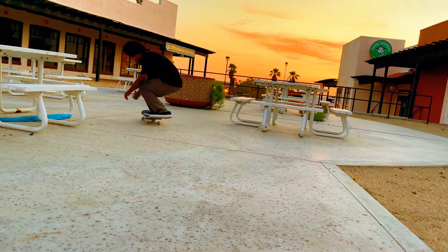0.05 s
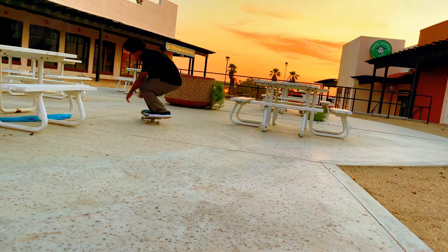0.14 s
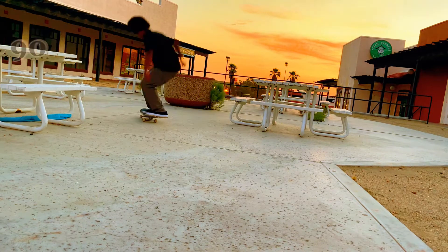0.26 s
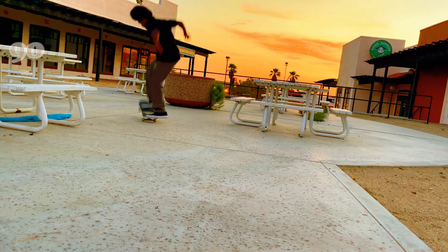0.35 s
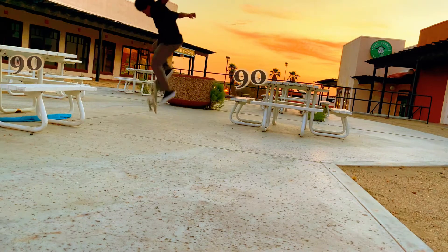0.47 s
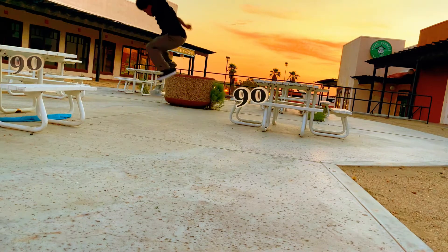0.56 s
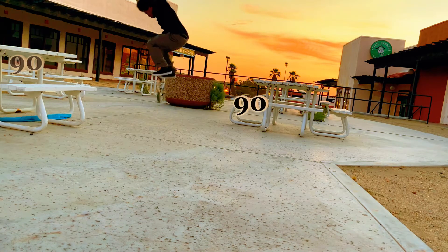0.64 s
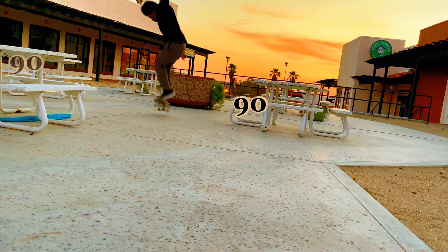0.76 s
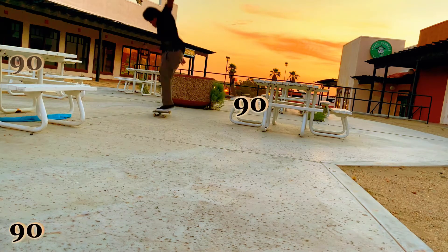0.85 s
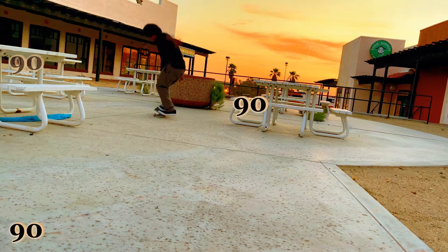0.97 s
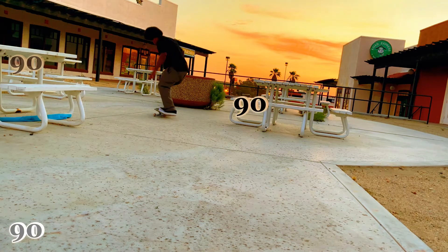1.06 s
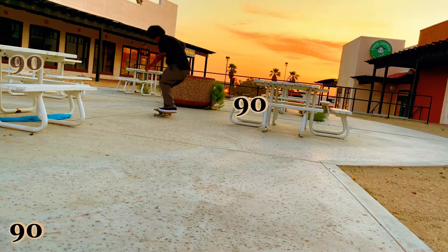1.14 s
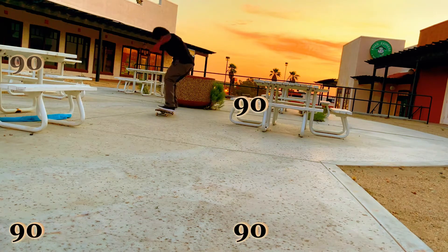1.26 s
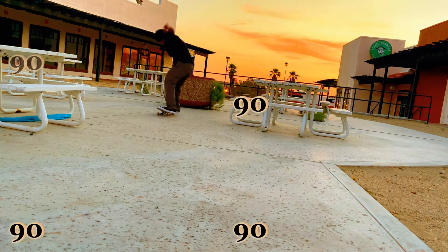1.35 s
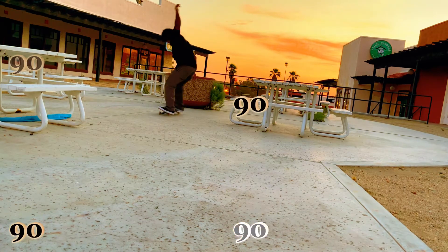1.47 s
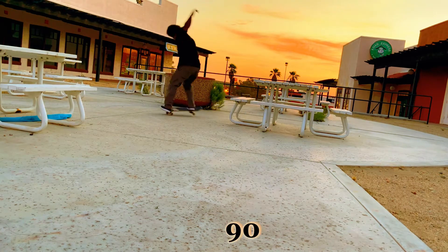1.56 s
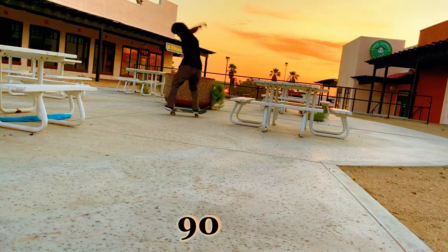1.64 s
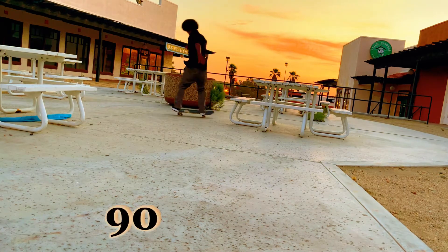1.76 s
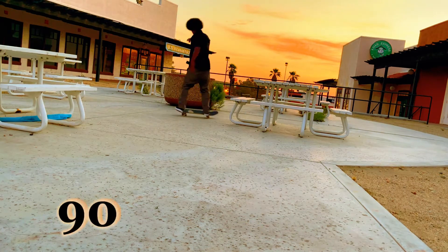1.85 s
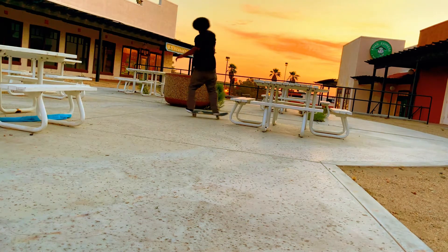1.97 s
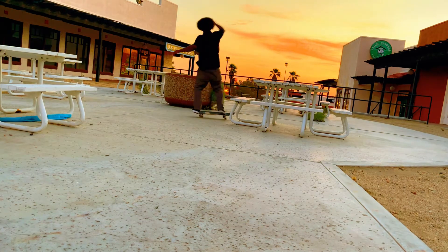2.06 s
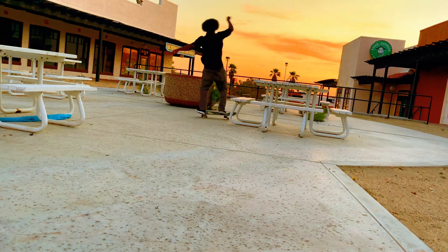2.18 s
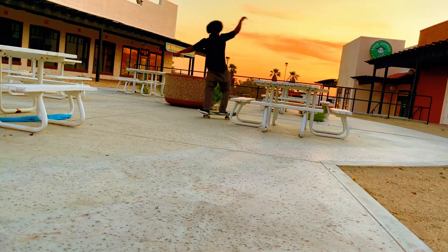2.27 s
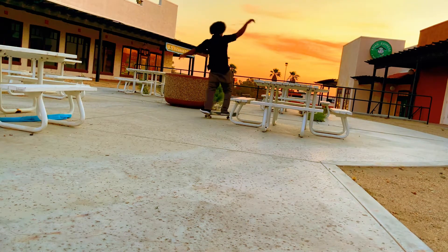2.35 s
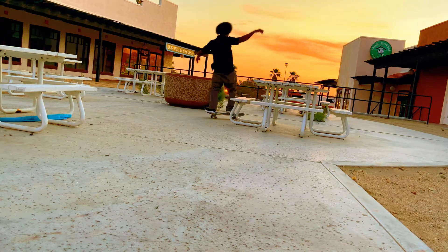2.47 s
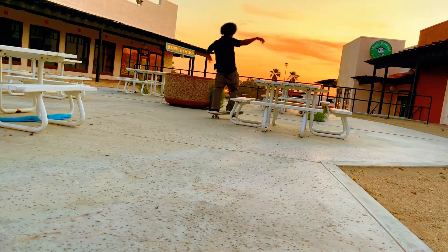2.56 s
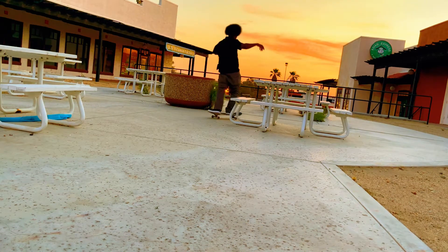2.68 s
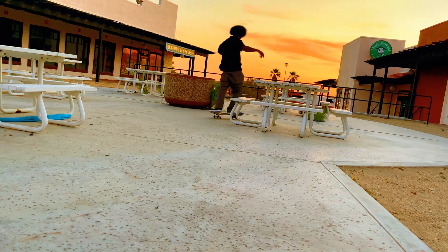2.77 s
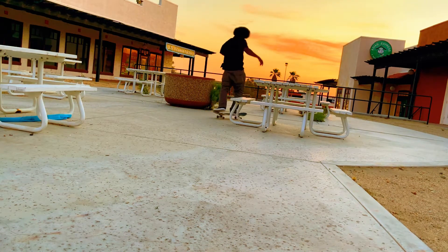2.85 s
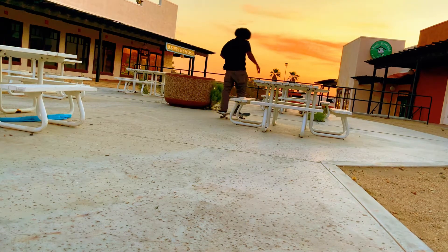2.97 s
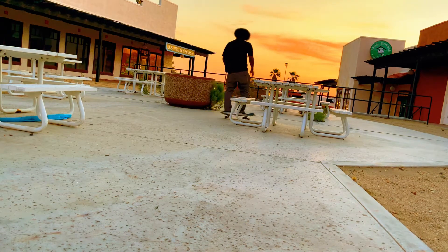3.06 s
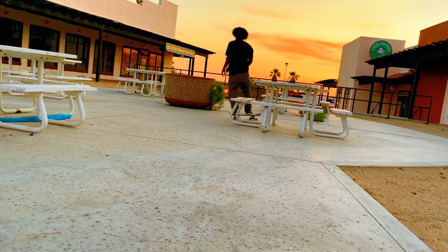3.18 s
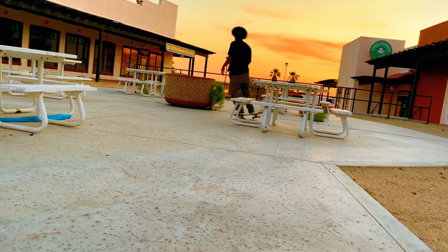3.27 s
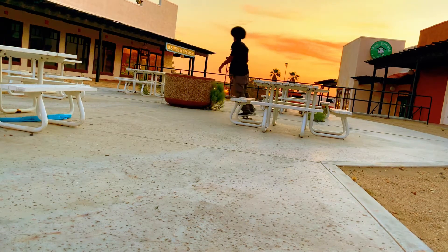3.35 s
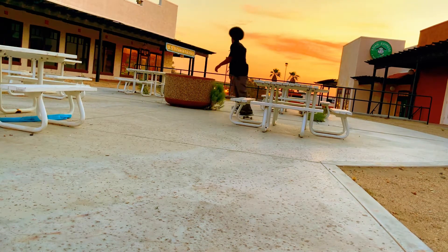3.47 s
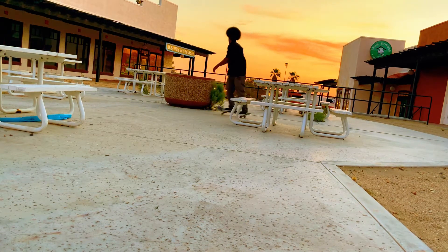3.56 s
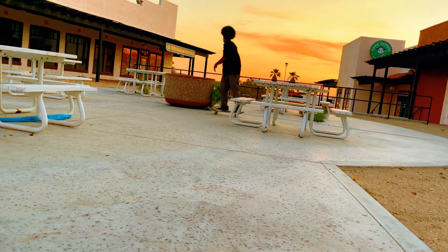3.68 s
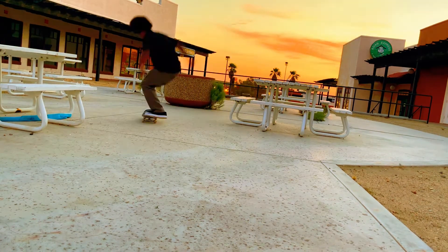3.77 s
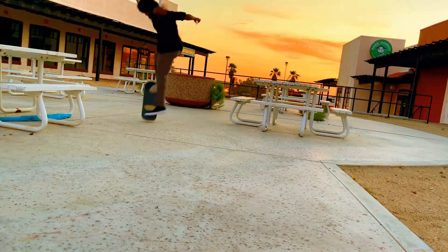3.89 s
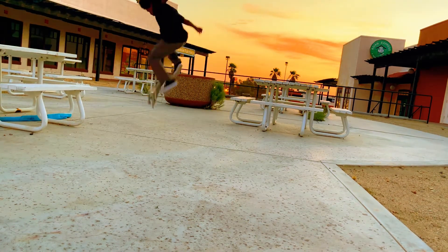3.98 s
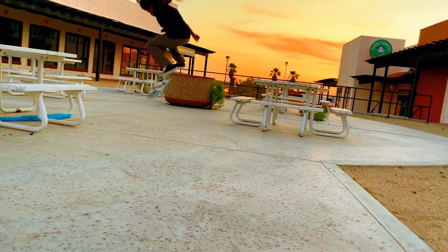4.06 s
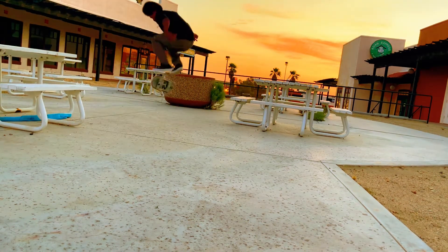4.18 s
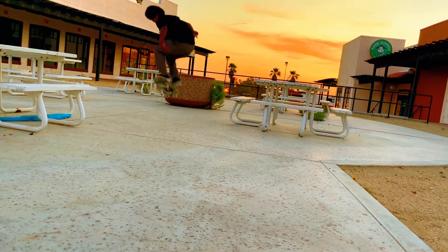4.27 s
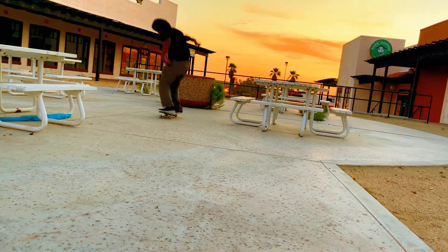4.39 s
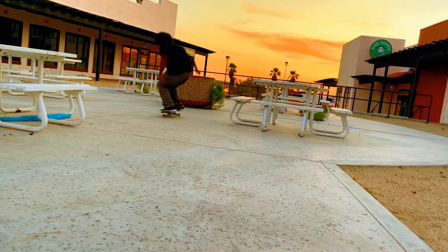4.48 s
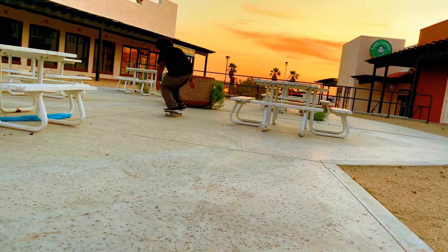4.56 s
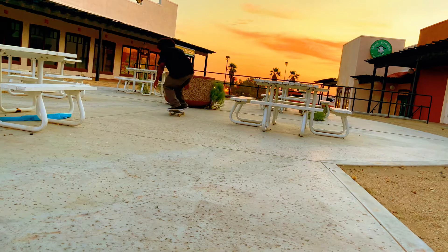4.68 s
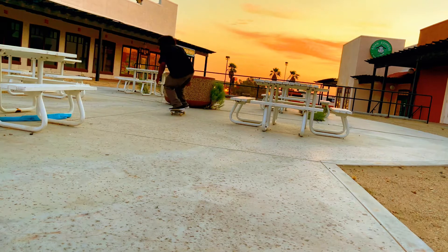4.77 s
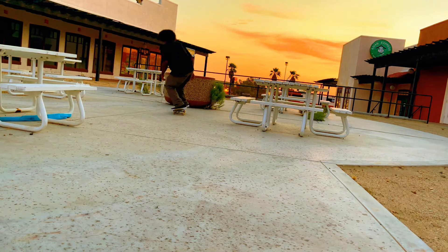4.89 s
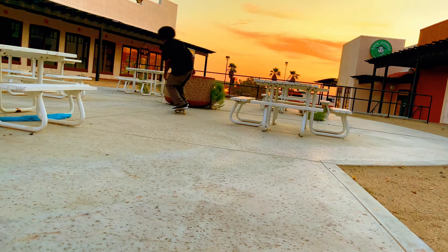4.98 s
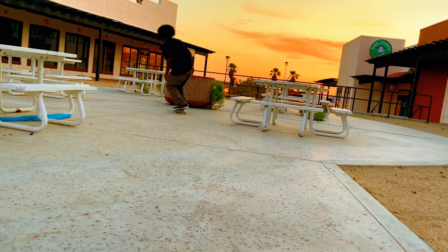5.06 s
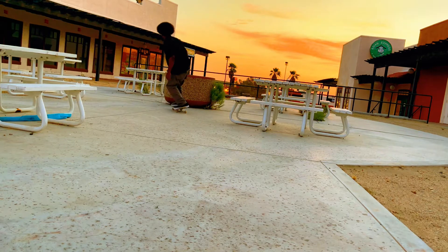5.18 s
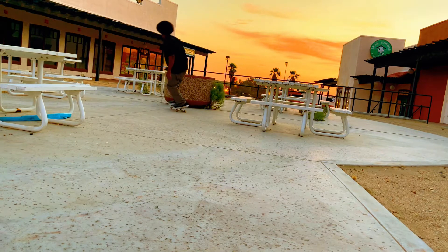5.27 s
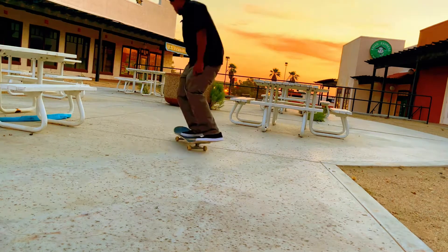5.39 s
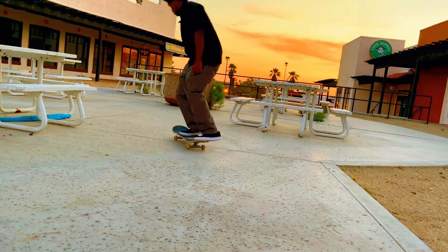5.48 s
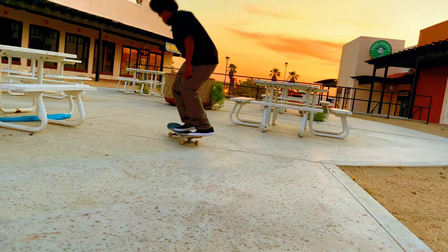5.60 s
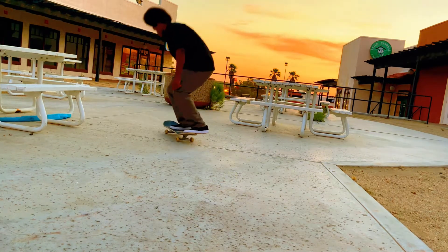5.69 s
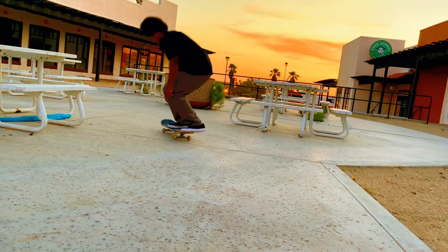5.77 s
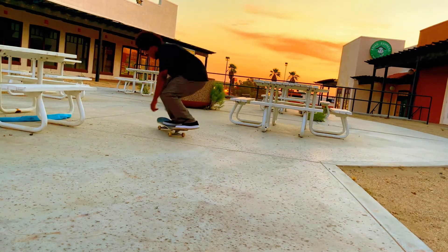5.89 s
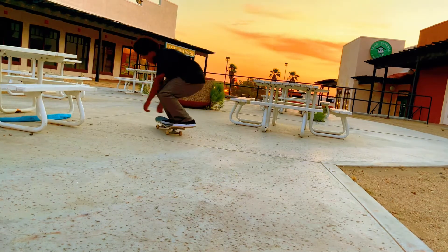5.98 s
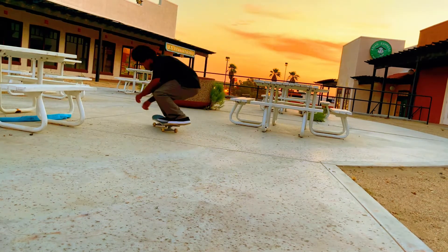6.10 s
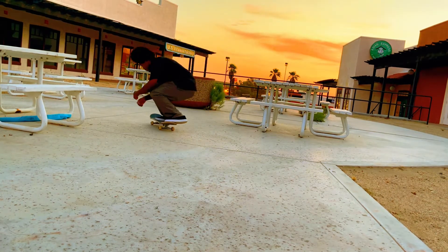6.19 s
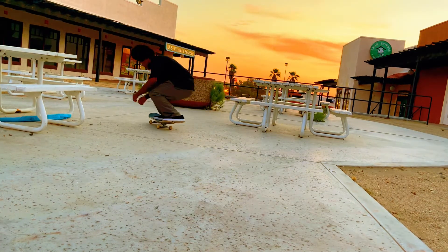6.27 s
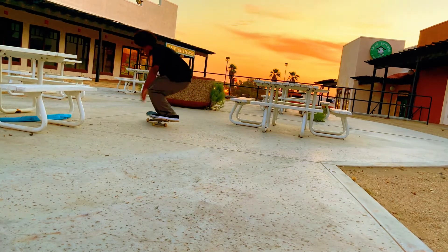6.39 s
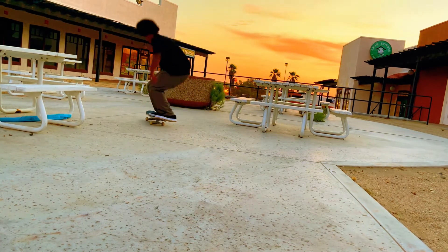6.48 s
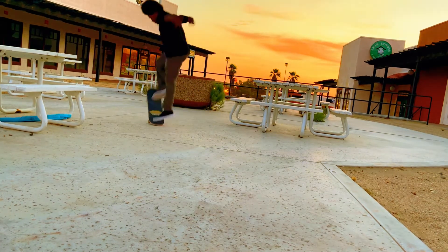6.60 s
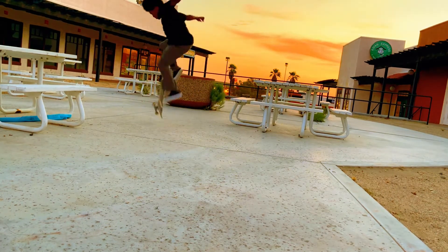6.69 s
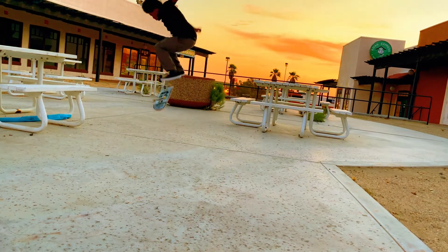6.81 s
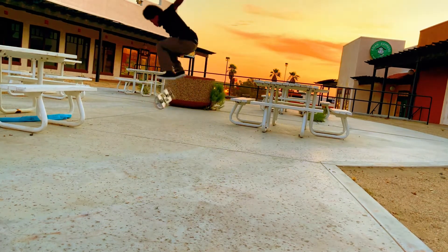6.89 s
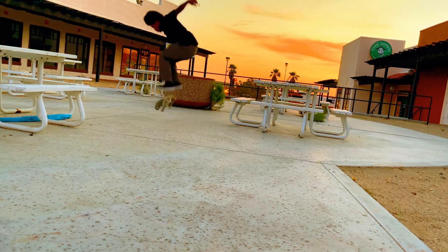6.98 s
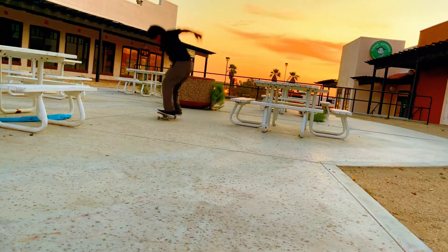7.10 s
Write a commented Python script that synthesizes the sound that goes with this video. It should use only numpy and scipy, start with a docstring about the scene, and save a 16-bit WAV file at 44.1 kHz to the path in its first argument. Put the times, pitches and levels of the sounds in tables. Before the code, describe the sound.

Outdoor concrete terrace with nearby walls, small stereo camera in gusty wind. Faint wheel rumble and gritty hiss open; at 0.32 s a loud, dry wooden pop with a short shoe rasp, then small metallic ticks and a fading hum while airborne. Landing clatters at 0.74-0.8 s, with rattle and further knocks at 1.02, 1.25 and 1.55 s. Wind flutters; a hard clack at 2.54 s has tiny squeaks just before it. Heavy wind puffs dominate 2.85-3.2 s. Light taps at 3.5 s, then a second pop at 3.82 s, a sharp hit at 4.22 s and a dense, loud landing at 4.31-4.34 s, axles chattering and rolling away. Rolling stays quiet as wind buffets strongly at 5.4-6.0 s. A third, slightly softer pop comes at 6.55 s, a brief airborne hush, and a hard clustered landing at 7.0 s with rattle and echo.

```python
"""A skateboard on a concrete terrace: pops, flips and landings clack through the wooden deck.
Each blow is a short noise burst that rings the deck's resonances; wheels roll and hiss as coloured noise,
a shoe drags up the sandpaper-like grip tape after each pop, and the trucks (axles) tick, squeak and chatter.
Gusty wind thumps on the two microphone ports of a small camera as noise and single pressure puffs.
Nearby walls answer the board with single copies and a fading noise-like echo."""
import sys
import numpy as np
from scipy import signal
from scipy.fft import rfft, irfft, next_fast_len
from scipy.io import wavfile
from scipy.ndimage import uniform_filter1d, map_coordinates

SR = 44100
rng = np.random.default_rng(int(sys.argv[2]) if len(sys.argv) > 2 else 0)


def file_out(sig):
    """Save sig as 16-bit WAV at sys.argv[1]."""
    # one column per channel
    cols = np.atleast_2d(sig).T
    # limit, then scale
    lim = np.clip(cols, -1, 1)
    pcm = np.round(lim * 32767).astype(np.int16)
    wavfile.write(sys.argv[1], SR, pcm)


def decibels_to_gain(level_db):
    """Convert a level in decibels to a linear amplitude gain (20 dB per decade)."""
    exponent = np.asarray(level_db, float) / 20
    return 10 ** exponent


N = 315006  # length in samples

# colour of the bearing hiss, also part of the shoe's rasp: (frequency [Hz], level [dB])
HISS_COLOUR = [(3000, -45), (6000, -16), (9000, -6.5), (12300, 4), (13200, -26.5)]
# colour of sandy grit, under wheels and shoe: (frequency [Hz], level [dB])
GRIT_COLOUR = [(1500, -39), (3000, -13), (4500, 8), (6000, -1), (9000, 4.5), (12300, -12.5), (13200, -27)]
# resonances of the wooden deck: (frequency [Hz], width [Hz], level [dB])
DECK_MODES = [(285, 80, 1), (487, 80, -2.5), (678, 121, 0), (852, 97, -3), (1090, 207, -0.5),
              (1350, 202, -1.5), (1620, 244, 0), (1947, 380, -0.5), (2500, 516, -0.5), (3024, 646, 0),
              (4640, 3600, -16)]


def unit(x):
    """Scale to an average strength (rms) of 1."""
    return x / np.sqrt(np.mean(x ** 2) + 1e-20)


def along(points, hz):
    """Read a curve of (frequency, value) points on a log frequency axis."""
    f, v = np.transpose(points)
    return np.interp(np.log(hz + 1), np.log(f + 1), v)


def curves(rows):
    """One value per sample for each column after the time."""
    s, *cols = np.transpose(rows)
    return [np.interp(np.arange(N) / SR, s, c) for c in cols]


def wobble(rate):
    """A smooth random curve with the given number of random points a second."""
    knots = rng.standard_normal(int(N * rate / SR) + 4)
    return map_coordinates(knots, [np.arange(N) * rate / SR])


def filtered(x, response):
    """Multiply the spectrum of x by a complex response of frequency."""
    m = next_fast_len(x.shape[-1] + 8192)
    return irfft(rfft(x, m) * response(np.fft.rfftfreq(m, 1 / SR)), m)[..., :x.shape[-1]]


def noise(spectrum, channels=1, patchy_db=0):
    """Coloured noise of rms 1 whose gain varies in small patches of time and frequency."""
    z = signal.stft(rng.standard_normal((channels, N)), nperseg=256)[2]
    field = uniform_filter1d(rng.standard_normal(z.shape[1:]), size=5, axis=0)
    field = uniform_filter1d(field, size=8, axis=1)
    patchy = signal.istft(z * decibels_to_gain(patchy_db * unit(field)), nperseg=256)[1][:, :N]
    return unit(filtered(patchy, lambda hz: decibels_to_gain(along(spectrum, hz))))


def modes(table):
    """Response of a set of resonances, each one ringing only after it is struck; signs alternate."""
    def response(f):
        return sum((-1) ** k * decibels_to_gain(db) * 1j * f * w / (c * c - f * f + 1j * f * w)
                   for k, (c, w, db) in enumerate(table))
    return response


def ports(x, loose):
    """x[0] reaches both ports with a lead and level step by frequency; x[1:] adds unrelated sound."""
    # phase by which the left port leads: (frequency [Hz], phase [radians])
    left_lead = [(0, 0), (1640, 0.35), (3100, 1.4), (4130, 1.0), (5000, 1.4), (6630, 0.0), (7580, 1.3),
                 (8870, -0.6), (11800, -6.1), (12400, -6.4), (13400, -9.5), (14400, -9.7), (15000, -12.6),
                 (16500, -12.6)]
    # left level minus right level: (frequency [Hz], level step [dB])
    left_over_right = [(60, -16), (110, 9), (200, -0.5), (380, 0.5), (700, 2), (1290, 3), (2380, 3),
                       (4400, 8.5), (8120, 3.5), (11500, -1.5), (15000, 6)]

    def both(hz):
        step = decibels_to_gain(along(left_over_right, hz) / 2) * np.exp(.5j * along(left_lead, hz))
        return np.array([step, 1 / step])
    return filtered(x[0], both) + loose * x[1:]


def bump(t, hz):
    """A passing eddy's pressure: one push between two pulls, quicker for a higher frequency."""
    u = np.pi * hz * t
    return (1 - 2 * u * u) * np.exp(-u * u)


def wind():
    """Slow swell, lumpy flutter and single pressure puffs, partly different on each port."""
    # gusts: (time [s], swell level [dB], flutter level [dB])
    gusts = [(0.0, -33, -44), (0.34, -48.5, -58), (0.73, -28, -38), (0.99, -36, -35.5),
             (1.65, -28.5, -45.5), (1.81, -38.5, -45.5), (2.58, -34, -45), (2.68, -42.5, -43),
             (2.96, -23, -30), (3.06, -31.5, -37), (3.16, -29, -30.5), (3.34, -32.5, -51), (3.54, -28, -47),
             (3.64, -39, -47), (4.28, -38, -44.5), (4.32, -44, -23), (4.39, -37, -29), (4.91, -30.5, -51.5),
             (5.37, -33.5, -46.5), (5.62, -34, -45), (5.79, -27, -37.5), (6.28, -33.5, -46.5),
             (6.48, -28, -32), (6.54, -30.5, -35), (6.82, -31.5, -39), (7.12, -30, -35.5), (7.14, -35, -26)]
    # single puffs at set times, from faint to strong:
    #         (time [s], level [dB], centre [Hz], sharp front relative to the puff [dB])
    set_puffs = [(0.134, -30, 202, -21), (0.165, -26, 233, -20), (0.47, -24, 124, -15),
                 (0.61, -25, 159.3, -14), (0.685, -24, 225, -19), (1.163, -20.5, 320, -12),
                 (1.194, -25, 121, -7), (1.23, -22, 133, -8.5), (1.395, -25, 175.6, -28),
                 (1.655, -17.5, 126, -15.5), (1.914, -22.5, 123, -16), (1.965, -26, 208, -11),
                 (2.0, -27.5, 122, -9), (2.028, -25.5, 220, -13), (2.058, -37, 137, -19),
                 (2.138, -19, 191, -19), (2.221, -42, 196, -19), (2.296, -28, 175, -22),
                 (2.324, -23, 168, -28), (2.359, -26.5, 124, -27), (2.6, -23, 175, -8.5),
                 (2.728, -28, 503, -5), (2.845, -22, 200, -18), (2.868, -16.5, 160, -19),
                 (2.885, -14, 300, -29), (2.895, -17.5, 300, -3), (2.923, -18.5, 148, -7.5),
                 (2.95, -18.5, 130, -23), (3.0, -20, 170, -18), (3.041, -13, 285, -18),
                 (3.084, -27, 148, -17), (3.129, -13, 200, -12), (3.146, -11.5, 180, -12.5),
                 (3.197, -19, 121, -8.5), (4.497, -21, 226, -19), (4.589, -18.5, 250, -19),
                 (4.932, -18, 160, -25), (5.016, -28, 122, -25), (5.146, -28.5, 121, -20),
                 (5.252, -25.5, 123, -20), (5.403, -27, 220, -11), (5.447, -23, 347, -6),
                 (5.465, -23, 256, 1.5), (5.482, -24, 200, -1), (5.543, -23, 165, -8.5),
                 (5.556, -23, 150, -15), (5.579, -27, 220, -12), (5.617, -29, 200, -7),
                 (5.64, -22, 160, -4.5), (5.695, -17, 190, -14), (5.721, -14.5, 131, -8),
                 (5.759, -17.5, 167, -12), (5.815, -15, 302, -7), (5.863, -17, 170, -7),
                 (5.921, -21.5, 223, -27), (5.976, -25.5, 248, -16), (5.994, -19, 175, -11.5),
                 (6.009, -19, 200, -14), (6.338, -28, 260, -20), (6.422, -22.5, 123.4, -3.5),
                 (6.456, -25, 160, -3), (6.475, -23, 153, -18), (6.695, -28, 215, 0.5),
                 (6.828, -15.5, 268, -24), (6.908, -22, 234, -11)]
    # colour of the slow swell: (frequency [Hz], level [dB])
    swell_colour = [(15, -42), (30, -16), (60, -0.5), (110, -4), (200, -12), (400, -35.5), (800, -71)]
    # colour of the quicker flutter: (frequency [Hz], level [dB])
    flutter_colour = [(60, -32.5), (150, 0), (270, 0), (450, -6), (750, -21.5), (1200, -35.5),
                      (2500, -80.5), (5000, -120)]

    swell_db, flutter_db = curves(gusts)
    a, b = noise(swell_colour, channels=2)
    swell = np.array([0.73 * a + 0.25 * b, 0.7 * a - 0.3 * b])
    swell = unit(decibels_to_gain(1.82 * wobble(25) + 1.77 * wobble(9))) * swell
    swell_gain = decibels_to_gain(swell_db)
    a, b = noise(flutter_colour, channels=2) * decibels_to_gain(0.48 * np.array([wobble(30), wobble(33)]))
    flutter = np.array([0.88 * a + 0.34 * b, 0.8 * a - 0.33 * b])
    flutter_gain = decibels_to_gain(flutter_db + 3 * wobble(45) + 2.5 * wobble(9))

    # 20 more puffs at random moments, a little above the swell
    random_puffs = [(s, swell_db[round(s * SR)] + 2.2, 299, -12) for s in rng.uniform(.1, 7, size=20)]
    all_puffs = set_puffs + random_puffs
    puffs, half = np.zeros((2, N)), 3000  # half: samples on each side of a puff
    t = np.arange(-half, half) / SR
    for (s, db, centre_hz, front_db), pan in zip(all_puffs, rng.standard_normal(len(all_puffs))):
        at = slice(round(s * SR) - half, round(s * SR) + half)
        late = t - .003  # the front snaps just after the push sets in
        front = bump(late, 450) + decibels_to_gain(-17) * bump(late, 950)  # a sharp edge with a thin top
        push = bump(t, centre_hz) + decibels_to_gain(front_db + 5) * front
        puffs[:, at] += decibels_to_gain(db + 2.4 * pan * np.array([[1], [-1]])) * push
        # smaller eddies crowd around the puff, and the swell rises with it
        flutter_gain[at] += decibels_to_gain(db - 11) * np.exp(-((t - .004) / 0.0076) ** 2)
        swell_gain[at] += decibels_to_gain(db - 15) * np.exp(-((t - .006) / 0.017) ** 2)
    # a puff's lows trail its highs
    sweep_turns = 0.815
    puffs = filtered(puffs, lambda hz: np.exp(
        -2j * np.pi * sweep_turns * np.log(np.clip(hz, 60, 1500) / 1500)))
    return swell_gain * swell + flutter_gain * flutter + puffs


def walls(x):
    """A diffuse echo: each frequency dies at its own speed, and every stretch of time gets a fresh tail."""
    # how long the echo takes to fall by 60 dB: (frequency [Hz], time [s])
    echo_t60 = [(200, 0.79), (1300, 0.37), (2600, 0.35), (5000, 0.82), (12000, 0.22)]
    out, size, delay = np.zeros((2, N + 2 * SR)), SR // 4, 300  # size and delay in samples
    for at in range(0, N, size):
        hz, t, z = signal.stft(rng.standard_normal((2, SR // 2)), SR, nperseg=256)
        fade = decibels_to_gain(-60 * t / along(echo_t60, hz)[:, None])
        tail = signal.istft(z * fade, SR, nperseg=256)[1]
        wet = signal.fftconvolve(x[None, at:at + size], tail / np.linalg.norm(tail[0]), axes=1)
        out[:, at + delay:at + delay + wet.shape[1]] += wet
    return out[:, :N]


def slaps(x):
    """Single coloured copies of the board's sounds off flat walls, with a delay for each port."""
    # nearest walls: (delay left [s], delay right [s], level [dB], centre [Hz], width [Hz])
    flat_walls = [(0.0175, .0182, -14, 1500, 3650), (.0420, 0.024, -36, 1264, 400)]

    def response(hz):
        return sum(modes([(c, w, db)])(hz) * np.exp(-2j * np.pi * hz * np.array([[left], [right]]))
                   for left, right, db, c, w in flat_walls)
    return filtered(x, response)


def wheels():
    """Rolling on rough concrete: a low drone mixed with background sound, sandy grit and bearing hiss."""
    # rolling: (time [s], drone level [dB], bearing hiss level [dB])
    rolling = [(0, -52.5, -60.5), (.2, -52.5, -62.5), (.24, -54, -63), (.3, -50, -61.5), (.72, -53, -38),
               (.79, -42.5, -60), (.95, -47, -67), (1.13, -44.5, -56), (1.49, -53.5, -59),
               (1.75, -52.5, -66), (2.01, -52, -59.5), (2.3, -55, -72.5), (2.7, -50, -69),
               (2.9, -56.5, -72), (3.1, -52, -61.5), (3.42, -54.5, -73), (3.68, -53.5, -65),
               (3.69, -44.5, -63.5), (3.78, -48.5, -61.5), (4.2, -51.5, -48.5), (4.35, -49, -55),
               (4.5, -40, -64), (4.7, -49, -64.5), (4.9, -51.5, -68.5), (5.3, -51.5, -64.5),
               (5.4, -49, -56.5), (5.75, -50, -57), (6.09, -53.5, -57.5), (6.4, -49, -57),
               (6.95, -53.5, -63), (7.14, -54, -68.5)]
    # jumps: (take-off [s], landing [s])
    flights = [(.33, .737), (3.83, 4.31), (6.55, 7.0)]
    # colour of the drone: (frequency [Hz], level [dB])
    drone_colour = [(200, -32), (500, 7), (1000, 2), (1400, -4), (1900, -8), (3000, -14.5), (5000, -25),
                    (12000, -52.5)]

    drone_db, hiss_db = curves(rolling)
    t = np.arange(N) / SR
    for up, down in flights:
        # unloaded bearings fade by 98 dB a second, down to a faint whirr
        hiss_db = hiss_db + np.maximum(-98 * (t - up), -20.5) * (t > up) * (t < down)
    # grit follows the drone fully and the hiss partly
    grit_db = -66.5 + (drone_db - drone_db.mean()) + 0.42 * (hiss_db - hiss_db.mean())
    grain, surface = wobble(170), wobble(8.4)
    drone = decibels_to_gain(drone_db + 0.66 * wobble(35)) * noise(drone_colour, channels=3, patchy_db=2.0)
    grit = decibels_to_gain(grit_db + 2.8 * grain + 2.0 * surface) * noise(GRIT_COLOUR, channels=3, patchy_db=2.5)
    hiss = decibels_to_gain(hiss_db + 1.7 * grain + 0.5 * surface) * noise(HISS_COLOUR, channels=3, patchy_db=4.0)
    return ports(drone, loose=1.0) + ports(grit, loose=0.15) + ports(hiss, loose=0.095)


def trucks():
    """Loose metal axles: ticks that ring for a few cycles, and squeaks that slide down with an overtone."""
    # short metal ticks, most of them while the board is in the air: (time [s], level [dB], frequency [Hz])
    ticks = [(0.402, -18.5, 4840), (0.455, -27, 2740), (0.497, -36, 4700), (.5455, -33, 3530),
             (.5605, -38.5, 4400), (.586, -26.5, 2700), (0.649, -39, 3670), (2.467, -43, 4600),
             (3.971, -26.5, 2400), (4.047, -31, 2170)]
    # faint squeaks: (start [s], length [s], from [Hz], to [Hz], level [dB])
    squeaks = [(2.453, 0.025, 3750, 3600, -54), (2.472, 0.027, 3180, 2900, -57),
               (6.28, 0.11, 3200, 2950, -65)]
    out, t = np.zeros(N), np.arange(SR // 10) / SR
    for s, db, hz in ticks:
        shape = decibels_to_gain(db - 60 * t / 0.0067) * (1 - np.exp(-t / 0.00032))
        out[round(s * SR):][:len(t)] += shape * np.sin(2 * np.pi * hz * t)
    rough, waver = decibels_to_gain(2.5 * wobble(200)), 1 + .025 * wobble(300)
    for s, length, from_hz, to_hz, db in squeaks:
        at = slice(round(s * SR), round(s * SR) + len(t))
        u = np.clip(t / length, 0, 1)
        pitch = (from_hz + (to_hz - from_hz) * u) * waver[at]
        turn = 2 * np.pi * np.cumsum(pitch) / SR
        tone = np.sin(turn) + 0.55 * np.sin(2 * turn)
        out[at] += decibels_to_gain(db) * np.sin(np.pi * u) * rough[at] * tone
    return out


def chatter():
    """Uneven rattling of the loaded trucks that swells, then fades as the board settles."""
    # rattling after the hard contacts: (start [s], rise [s], level [dB], fall by 60 dB [s])
    settles = [(.8, 0.083, -48, 2.8), (2.56, 0.056, -51.5, 1.15), (4.34, 0.19, -43, 1.15),
               (7.03, 0.078, -46, 1.1)]
    # resonances of the trucks: (frequency [Hz], width [Hz], level [dB])
    truck_modes = [(1500, 350, 6.5), (1850, 550, 16.5), (2400, 360, 0)]
    t = np.arange(N) / SR
    level = sum(decibels_to_gain(db - 60 * np.maximum(t - s - rise, 0) / t60) * np.clip((t - s) / rise, 0, 1)
                for s, rise, db, t60 in settles)
    uneven = decibels_to_gain(2.5 * wobble(120)) * rng.standard_normal(N)
    return level * unit(filtered(uneven, modes(truck_modes)))


def shoe():
    """Sandpaper rasp along each drag; the deck's upper modes keep humming unevenly while the board flips."""
    # drags: (start [s], length [s], rasp level [dB], hum level [dB], hum fall by 60 dB [s],
    #         loudest humming mode [Hz], narrow ring level [dB])
    drags = [(0.324, 0.097, -44, -40, 0.98, 2300, -39), (3.834, 0.071, -42, -42.5, 0.93, 2300, -43),
             (6.546, 0.05, -39, -43, 0.8, 2500, -51)]
    t, rasp, hum = np.arange(N) / SR, 0, 0
    narrow_mode = [(1330, 45, 0)]  # sings on after a pop: (frequency [Hz], width [Hz], level [dB])
    ring_t60 = 0.81  # s
    for s, length, rasp_db, hum_db, t60, hz, ring_db in drags:
        rasp = rasp + decibels_to_gain(rasp_db) * np.sin(np.pi * np.clip((t - s) / length, 0, 1))
        # modes weaken by 8 dB for each octave away from the loudest
        free = [(c, w, -8 * abs(np.log2(c / hz))) for c, w, _ in DECK_MODES[7:10]]
        broad = unit(filtered(rng.standard_normal(N), modes(free)))
        hum = hum + decibels_to_gain(hum_db - 60 * np.abs(t - s) / t60) * (t > s) * broad
        ring = unit(filtered(rng.standard_normal(N), modes(narrow_mode)))
        hum = hum + decibels_to_gain(ring_db - 60 * np.abs(t - s) / ring_t60) * (t > s) * ring
    sand = noise(HISS_COLOUR)[0] + 0.87 * noise(GRIT_COLOUR)[0]
    return rasp * decibels_to_gain(0.57 * wobble(180)) * sand + hum * decibels_to_gain(4.0 * wobble(40) + 2.6 * wobble(150))


def peak(x):
    """Scale to a highest point of 1."""
    return x / np.abs(x).max()


def blows():
    """Each contact is a short rattle that rings the deck modes nearest its spot and cracks on the concrete."""
    # contacts of tail, wheels and shoes: (time [s], knock level [dB], thud relative to knock [dB],
    #         crack relative to knock [dB], loudest mode [Hz])
    contacts = [(.236, -44, -7, 12, 1500), (0.321, -4.5, -2.5, 1, 1350), (0.339, -15.5, -8, 2, 1300),
                (0.616, -30.5, -16, 12.5, 2720), (0.7364, -11, -6, 5.5, 1350), (0.749, -12.5, -3, 13, 2400),
                (0.7594, -10, 7.5, 9.5, 860), (0.7762, -12.5, -3, 5, 1080), (0.785, -27, 4, 3, 1100),
                (0.8053, -17, 1, 4.5, 1130), (1.0081, -19.5, 7, 10, 1400), (1.0213, -7.5, -6, -0.5, 1500),
                (1.0359, -37.5, 23, 24.5, 1080), (1.049, -30, -20, -9, 1650), (1.2475, -20.5, -1, -4, 1130),
                (1.2658, -23.5, -38, 6, 1280), (1.419, -41, -12, 17, 1330), (1.5416, -19.5, -1, 10.5, 1090),
                (1.5543, -16, -1.5, 8.5, 1820), (1.571, -34.5, 8, 11, 1500), (2.0953, -36, 0, 19, 1590),
                (2.1758, -33.5, -33, 10.5, 1070), (2.5385, -8, -6.5, -1, 1630), (2.5438, -14, -1, -4, 890),
                (2.5497, -15.5, -3, 6, 980), (2.9037, -47, 23, 2, 1310), (3.047, -44.5, -20, -1, 3300),
                (3.525, -23.5, -5, 12.5, 1450), (3.5682, -28.5, 0.5, 12.5, 1820),
                (3.711, -43, -20, 5, 2900), (3.74, -48.5, 17, 21, 1020), (3.8227, -7, -1, -10, 1210),
                (3.842, -16.5, -7, 0, 1300), (4.2152, -8, -3, -0.5, 2220), (4.244, -20, 2, 0, 1300),
                (4.2625, -29, -10.5, 8, 1110), (4.3055, -8.5, 1.5, 2, 1530), (4.3119, -6.5, -1, 5.5, 1600),
                (4.3256, -5.5, -10.5, 2, 1500), (4.3417, -13.5, -4.5, -3, 1740),
                (4.358, -25, -7, -12, 1800), (4.9302, -35.5, -13, 4.5, 1470), (6.4675, -49, 21.5, 21, 1080),
                (6.5465, -10.5, -3.5, -0.5, 1730), (6.566, -16.5, -12, 2, 1180),
                (6.627, -39, -20, 13, 3000), (6.773, -40, 6.5, 1, 2400), (6.989, -36.5, 12, -26.5, 910),
                (6.999, -5.5, -6, -1.5, 1160), (7.0038, -7.5, -14, 2.5, 1440), (7.0149, -6, -2, 2, 1460),
                (7.03, -21, -1, -1, 1500), (7.092, -27.5, 0, -2.5, 1600)]
    out, t = np.zeros(N + SR), np.arange(SR // 8) / SR
    low = [mode for mode in DECK_MODES if mode[0] < 780]
    bins = np.fft.rfftfreq(len(t), 1 / SR)  # 8 Hz apart
    for s, db, thud_db, crack_db, hz in contacts:
        # lighter contacts chatter longer
        t60 = max(0.033 - 0.00049 * db, .004)
        # row 0 drives the knock, row 1 the crack, which is over sooner
        fade = decibels_to_gain(-60 * t / t60 * [[1], [1.3]]) * (1 - np.exp(-t / 0.00029))
        rattle = rng.standard_normal((2, len(t))) * fade
        # the first firm touch, 1.1 ms in, stands out of the rattle
        rattle[:, round(.0011 * SR)] += decibels_to_gain([17, 12.5])
        # even out the knock's chance colour over about 500 Hz
        colour = uniform_filter1d(np.abs(rfft(rattle[0])) ** 2, size=500 // 8) ** .5
        rattle[0] = filtered(rattle[0], lambda f: 1 / np.interp(f, bins, colour))
        # upper modes weaken by 13.5 dB an octave away from the spot's own, 14 dB at most
        high = [(c, w, level - min(13.5 * abs(np.log2(c / hz)), 14))
                for c, w, level in DECK_MODES[len(low):]]
        knock = peak(filtered(rattle[0], modes(high)))
        thud = decibels_to_gain(thud_db) * peak(filtered(rattle[0], modes(low)))
        crack = decibels_to_gain(crack_db) * peak(filtered(rattle[1], lambda f: (1j * f / (5000 + 1j * f)) ** 2))
        out[round(s * SR):][:len(t)] += decibels_to_gain(db) * (knock + thud + crack)
    return out[:N]


def scene():
    """Board sounds with their slaps and echo, rolling, and wind."""
    board = blows() + shoe() + trucks() + chatter()
    echoing = ports(np.vstack([board, walls(board)]), loose=decibels_to_gain(-13.0))
    return echoing + slaps(board) + wheels() + wind()


def band_limit(x):
    """A steep low-pass at the top of the band."""
    return signal.sosfilt(signal.butter(12, 16870, fs=SR, output="sos"), x)


def record(dry):
    """The camera colours the treble, its low-cut filter delays the lows, and the loudest peaks are rounded."""
    # the top end as heard: two treble humps near 9.7 and 11 kHz, then almost nothing above 13 kHz:
    #         (frequency [Hz], level [dB])
    top_end = [(5000, 1), (7000, 1.5), (8900, 2.5), (9700, 7), (10200, 4.5), (10800, 7), (11400, 7),
               (12300, -10), (13000, -6), (14000, -46), (15500, -21), (16600, -51.5)]

    def camera(hz):
        # later lows make puffs and blows sweep downward
        late = np.exp(-2j * np.pi * 0.916 * np.log(np.clip(hz, 60, 1000) / 1000))
        return decibels_to_gain(along(top_end, hz)) * late
    heard = filtered(dry, camera)
    heard = heard / (1 + np.abs(heard / .97) ** 6) ** (1 / 6)
    return band_limit(heard)


dry = scene()
out = record(dry)
file_out(out)
```